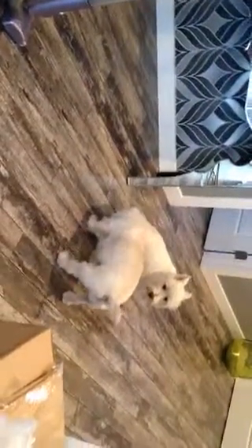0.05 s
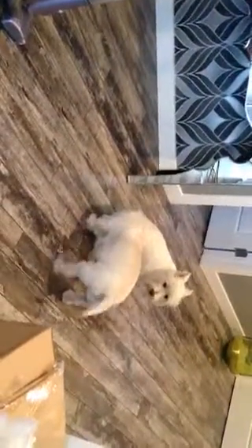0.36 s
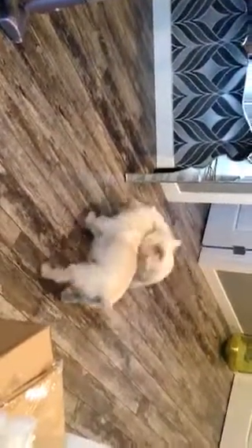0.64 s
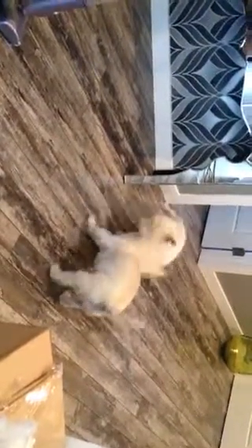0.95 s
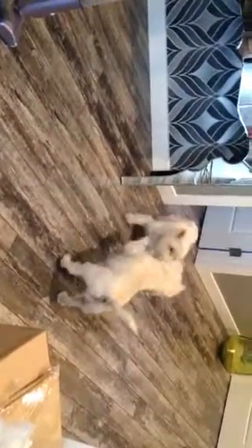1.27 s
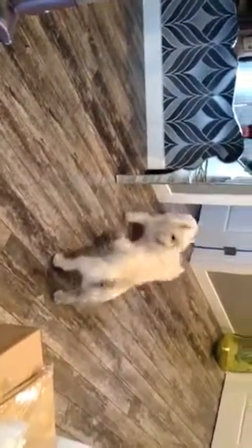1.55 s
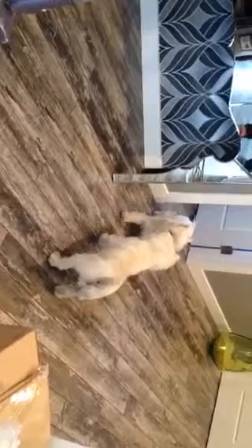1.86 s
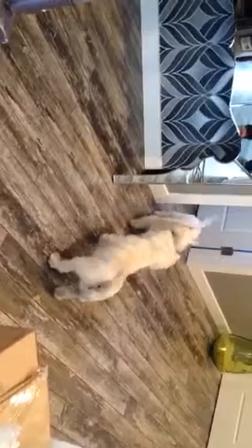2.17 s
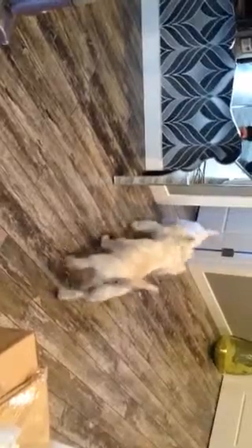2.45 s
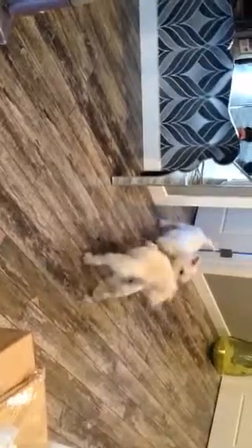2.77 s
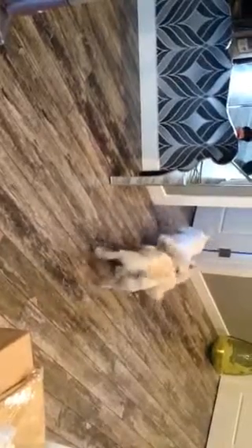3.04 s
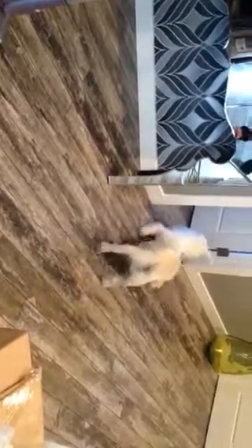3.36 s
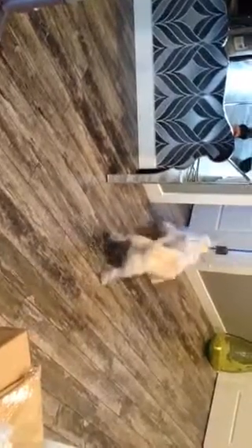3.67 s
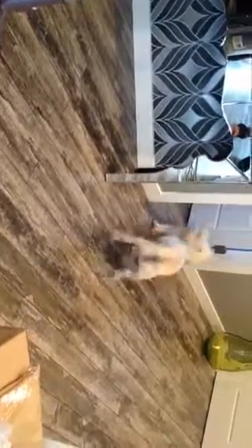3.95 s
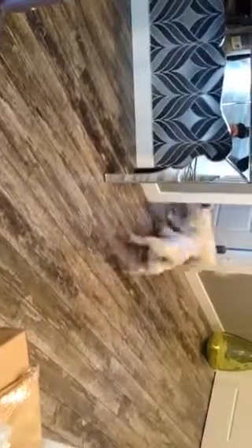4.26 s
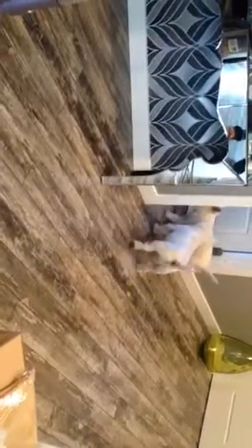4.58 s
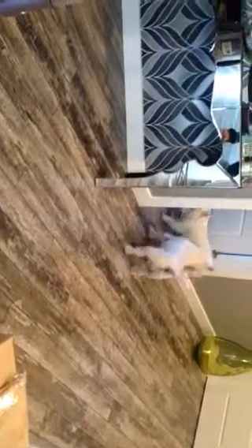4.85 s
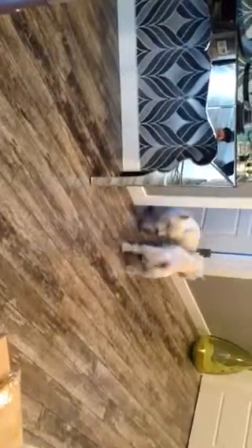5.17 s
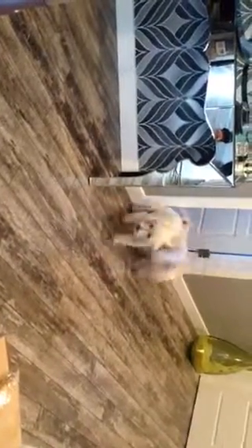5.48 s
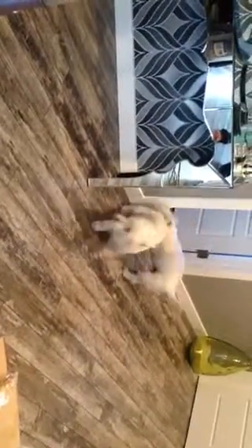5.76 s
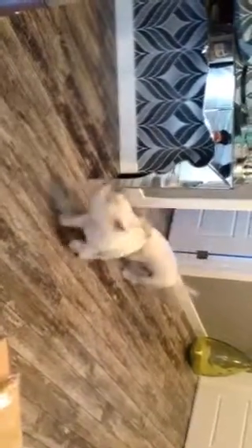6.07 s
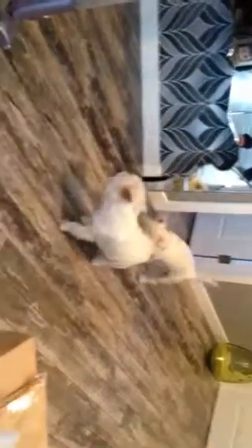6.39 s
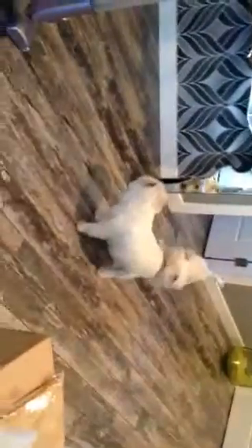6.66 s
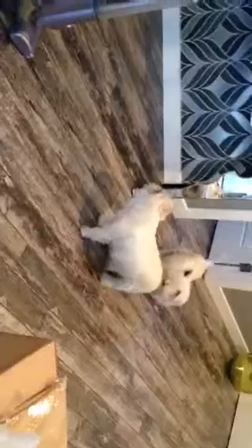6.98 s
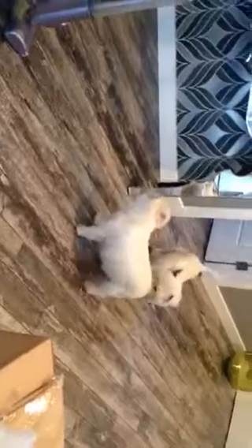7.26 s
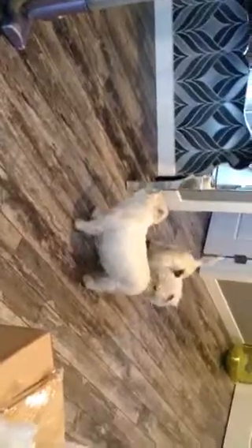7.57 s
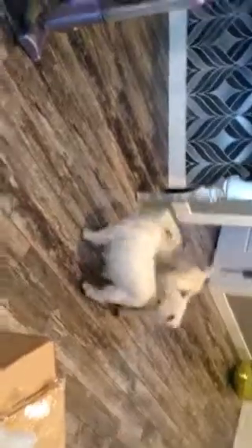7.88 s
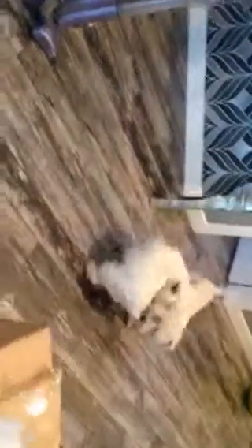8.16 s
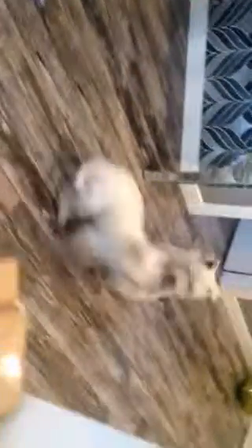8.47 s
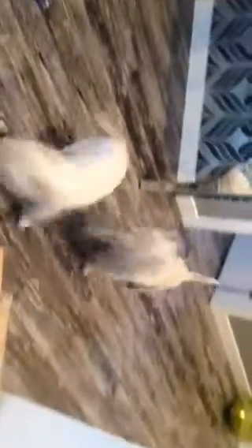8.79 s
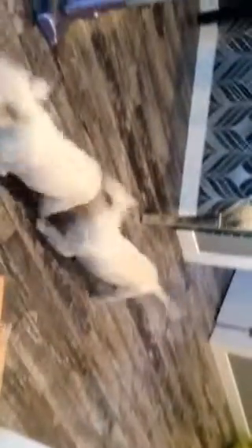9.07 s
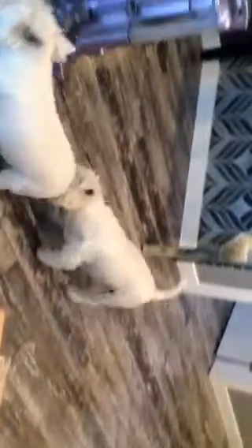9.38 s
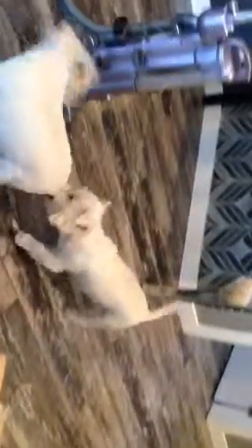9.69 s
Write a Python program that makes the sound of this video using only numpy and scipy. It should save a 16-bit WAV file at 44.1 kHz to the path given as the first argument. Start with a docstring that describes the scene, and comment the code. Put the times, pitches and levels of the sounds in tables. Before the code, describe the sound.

Quick, irregular claw clicks, skids and soft paw thumps of two little dogs tussling indoors, with one bump against a door.

```python
"""Two small dogs wrestle on a plank floor in a hallway, a couple of metres away.
Claws click and chatter, toes rap the planks, paws thump the boards, skid and scrape by stick and slip.
Once a body bumps the door and its latch rattles; later a plastic appliance shell clatters.
Bare walls ring for about half a second over a faint hiss."""
import sys
import numpy as np
from scipy import signal
from scipy.fft import rfft, irfft
from scipy.io import wavfile
from scipy.ndimage import uniform_filter1d

SR = 44100
rng = np.random.default_rng(int(sys.argv[2]) if len(sys.argv) > 2 else 0)


def int16_out(signal):
    """Quantize to a 16-bit WAV file."""
    q = np.round(np.clip(np.atleast_2d(signal).T, -1, 1) * 32767)
    wavfile.write(sys.argv[1], SR, q.astype(np.int16))


N = 437913

# Paw skids. Each row: start in seconds, level in dB, gritty treble in dB, rise time in seconds.
SKID_EVENTS = [(.550, -49, -27, 0.0088), (.635, -51, -23, 0.032), (0.709, -49, -15, 0.017),
               (.905, -54, -12, 0.018), (.963, -44, -7, 0.012), (1.044, -45, -29, 0.011),
               (1.10, -49, -29, 0.015), (1.298, -45.5, -10.5, 0.021), (1.659, -58, -2, 0.025),
               (1.843, -51, -14, 0.0091), (2.524, -50.5, -5, 0.01), (2.673, -53.5, -13, 0.029),
               (3.14, -54, -4, 0.024), (3.175, -52, -8, 0.012), (3.444, -46.5, 2, 0.0073),
               (3.5, -48.5, -24, 0.019), (3.607, -49.5, -6, 0.013), (4.231, -47.5, -9, 0.023),
               (4.535, -54, -4, 0.012), (4.6, -55.5, -2, 0.021), (4.796, -53, -9, 0.018),
               (5.319, -53.5, 0, 0.028), (5.366, -50, -22, 0.013), (5.481, -53, 8.5, 0.0089),
               (5.635, -54, 2.5, 0.021), (5.875, -52.5, -5, 0.0077), (5.925, -48, -27, 0.021),
               (6.068, -46, -24, 0.015), (6.118, -49.5, -26, 0.011), (6.175, -53, -18, 0.013),
               (6.339, -59.5, -2, 0.011), (6.505, -56.5, -20, 0.034), (6.888, -54, -5, 0.013),
               (7.545, -55.5, -13, 0.01), (8.038, -48.5, -10, 0.018), (8.229, -54, -11, 0.023),
               (8.514, -47.5, -4, 0.01), (8.569, -54, -17, .014), (8.665, -46, -4, 0.0086),
               (8.876, -45, -19, 0.0043), (9.355, -54.5, -5, 0.007), (9.596, -60.5, -4, 0.035),
               (9.88, -51, -11, 0.0066)]
# Floorboard modes under a paw. Each row: pitch ratio, width in Hz, level in dB.
BOARD_MODES = [(.88, 50.6, -25), (1.02, 58.7, 13.5), (1.15, 60, -12), (2.3, 300, -8)]
# Spectrum of a sliding paw. Each row: frequency in Hz, level in dB.
RASP_SPECTRUM = [(150, -18), (350, -5), (560, -9.5), (950, -6), (1250, -6.5), (1700, -2.5), (2250, 1.5),
                 (2750, -5.5), (3300, 0.5), (4500, -2.5), (5600, -4), (7000, -13), (11000, -21.5),
                 (15500, -23.5)]
SPOT_SCATTER = 0.14  # relative spread of plank pitch from spot to spot


def undb(db):
    return 10 ** (np.asarray(db) / 20)


def unit(x):
    """Scale to rms 1."""
    return x / np.sqrt(np.mean(x ** 2))


def crest(x, size):
    """Scale the loudest `size` samples to rms 1."""
    return x / np.sqrt(uniform_filter1d(x ** 2, size, mode="constant").max())


def add(track, start_s, x):
    """Mix x into the track."""
    i = int(np.clip(start_s * SR, 0, N - 1))
    track[i:i + len(x)] += x[:N - i]


def band(x, lo_hz, hi_hz, order=3):
    """Butterworth band-pass."""
    edges_hz = np.clip([lo_hz, max(hi_hz, 1.1 * lo_hz)], [20, 30], [18000, 20000])
    return signal.sosfilt(signal.butter(order, edges_hz, "band", fs=SR, output="sos"), x)


def ring(x, hz, width_hz):
    """One resonance, gain 1 at its centre."""
    return signal.lfilter(*signal.iirpeak(min(hz, SR / 2.2), max(hz / width_hz, .5), fs=SR), x)


def body(x, modes):
    """Ring a set of modes; dB sets the energy of each."""
    return sum(undb(db) * ring(x, hz, width_hz) / np.sqrt(width_hz) for hz, width_hz, db in modes)


def colour(x, spectrum):
    """Filter by (Hz, dB) points."""
    hz, db = np.transpose(spectrum)
    bins_hz = np.maximum(np.fft.rfftfreq(len(x), 1 / SR), 1)
    return irfft(rfft(x) * undb(np.interp(np.log(bins_hz), np.log(hz), db)), len(x))


def jitter(count):
    """Normal draws clipped to +-2."""
    return np.clip(rng.standard_normal(count), -2, 2)


def uneven(rows, spread_db):
    """Shift the dB that ends each row at random."""
    return [(*row[:-1], row[-1] + spread_db * z) for row, z in zip(rows, jitter(len(rows)))]


def sway(spread_db, size):
    """Gain gliding to a new random level every `size` samples."""
    levels_db = spread_db * jitter(N // size + 2)
    return undb(np.interp(np.arange(N) / size, np.arange(len(levels_db)), levels_db))


def grit(count, spread_db, size=32):
    """Stick and slip: noise whose strength jumps every `size` samples."""
    slips = undb(spread_db * jitter(count // size + 1))
    return unit(rng.standard_normal(count) * np.repeat(slips, size)[:count])


def strike(count, chatter_s):
    """A firm first contact, then a fading chatter of small ones."""
    t = np.arange(count) / SR
    force = grit(count, spread_db=2.5) * np.exp(-t / chatter_s)
    force[0] = 1.6
    return force


def hiss(level_db=-67.5):
    """Faint steady background noise."""
    # Each row: frequency in Hz, level in dB.
    spectrum = [(25, -21), (81, -6.5), (270, -6), (750, -13.5), (1080, -14.5), (13600, -17.5),
                (15500, -19.5)]
    return undb(level_db) * unit(colour(rng.standard_normal(N), spectrum))


def fading_ring(hz=1520, width_hz=400, level_db=-72.5, t60_s=1.8):
    """A faint mid-pitched ring dies away from the start."""
    tone = unit(ring(ring(rng.standard_normal(N), hz, width_hz), hz, width_hz))
    return undb(level_db) * tone * np.exp(-np.log(1000) * np.arange(N) / SR / t60_s)


def nail_ring(force, hz):
    """A claw rings for a few cycles: a bright ping."""
    return band(ring(force, hz, width_hz=1140), 0.694 * hz, 1.335 * hz)


def claws(count=2048):
    """Claws hit, chatter and ring. Returns the direct sound and the feed to the walls."""
    # Each row: start in seconds, level in dB, chatter time in seconds, wall feed in dB, ring in Hz.
    hits = [(0.524, -35, 0.0012, -2, 4650), (0.5505, -36, 0.00067, -24, 4370),
            (.65, -41.5, .0007, -8, 5070), (.673, -40, .0009, 0.5, 4570), (.726, -37, 0.0021, -5, 4750),
            (.9629, -41.5, .0036, 7.5, 4470), (0.9818, -39.5, .0026, 1.5, 3450),
            (1.0453, -37.5, .0009, -8, 4150), (1.2548, -41, 0.003, 2.5, 4470),
            (1.841, -39, 0.0036, -5, 4400), (2.1198, -52, 0.00091, 2, 4800), (2.519, -45.5, .0019, 1, 4370),
            (2.5432, -46, .0016, 3.5, 4250), (2.6739, -45.5, 0.0012, 0, 4230),
            (2.9469, -39, 0.0011, -4.5, 4650), (3.175, -49, 0.0037, -3, 4620),
            (3.221, -47, 0.00077, 4.5, 4460), (3.336, -52.5, .0007, 4.5, 4160),
            (3.4462, -37.5, 0.002, -1.5, 4050), (3.5193, -49.5, .0044, 12.5, 4660),
            (3.6078, -36.5, 0.0012, -9, 4340), (3.8169, -31, .0014, -0.5, 4100),
            (4.1081, -42, 0.0024, 2, 4400), (4.163, -46.5, .0007, -1, 3600), (4.186, -45, .0025, 6, 4370),
            (4.2104, -38.5, 0.00097, -4, 3980), (4.474, -53, .0006, -6, 4200),
            (4.5419, -55, 0.0024, 2, 3600), (4.8161, -49, .0014, 5.5, 3680), (5.366, -39.5, .003, 0, 3750),
            (5.453, -45, 0.0046, 1, 3800), (5.4817, -37, 0.0017, 4.5, 3900), (5.5453, -44, .0015, -1, 4100),
            (5.658, -41.5, .0025, 2.5, 3940), (5.8726, -41.5, 0.0012, 1, 4080),
            (6.034, -42.5, 0.0015, 3.5, 4410), (6.119, -38, 0.0027, -14, 4300),
            (6.338, -45, 0.0042, -6, 4000), (6.372, -53, .0012, -2, 4900),
            (6.6592, -48, 0.00095, 3.5, 4630), (6.672, -52.5, .0012, 4.5, 4200),
            (7.0396, -51.5, 0.00088, 5, 5100), (7.2059, -51, 0.0036, 1, 4940),
            (7.546, -52, .002, 2.5, 4770), (7.8587, -44, 0.0059, 0.5, 4740), (7.968, -47, .001, 3.5, 4240),
            (8.038, -43, .0011, 2.5, 4600), (8.051, -44, 0.0021, -10, 4250),
            (8.2785, -43, 0.00098, -7, 4800), (8.3385, -45, .0014, 6, 4800),
            (8.5142, -32, .0007, -4.5, 5000), (8.5885, -40.5, 0.00055, -1, 5270),
            (8.6456, -30, 0.0007, -4, 5450), (8.6754, -38, 0.0032, -13, 5110),
            (8.8427, -44.5, .0007, -9, 5600), (8.876, -32, 0.0025, -1.5, 5130),
            (9.0571, -32, 0.0012, -7, 5020), (9.1575, -31, 0.00016, 0, 6300), (9.1612, -30, .0037, 1, 4570),
            (9.356, -50, .0021, -4, 4950), (9.724, -54, .0011, 4.5, 4290), (9.879, -47.5, 0.0013, -8, 4860)]
    # Treble tick over the scene. Each row: time in seconds, level against the nail in dB.
    tick_curve = [(0.55, -37), (1.0, -22), (3.15, -15), (3.9, -9.5), (5.5, -19), (7.1, -15), (8.1, -12),
                  (8.6, -8.5), (9.9, -6)]
    # Modes of the plank's hard top layer. Each row: frequency in Hz, width in Hz, level in dB.
    plank_modes = [(686, 560, -4.5), (2190, 220, 3.5), (3400, 350, 0), (5000, 1000, 7)]
    direct, to_walls = np.zeros((2, N))
    t, impulse = np.arange(count) / SR, signal.unit_impulse(count)
    for start_s, db, chatter_s, wall_db, hz in hits:
        force = strike(count, chatter_s)
        force += 0.13 * grit(count, spread_db=4.5) * np.exp(-t / 0.011)  # neighbouring toes
        nail = crest(nail_ring(force, hz), size=64)
        tick_db = np.interp(start_s, *np.transpose(tick_curve))
        treble = ring(band(force, 6300, 14000, order=2), hz=8400, width_hz=3700)
        tick = undb(tick_db) * crest(treble, size=64)
        spot = np.exp(SPOT_SCATTER * rng.standard_normal())
        modes = [(spot * mode_hz, width_hz, mode_db) for mode_hz, width_hz, mode_db in plank_modes]
        plank = undb(-13.5) * crest(body(force, modes), size=64)
        add(direct, start_s, undb(db) * (nail + tick + plank))
        # The plank radiates all round, so the walls get a broader spectrum.
        broad = undb(-4) * unit(ring(impulse, hz, width_hz=5600))
        broad += undb(-5.5) * unit(body(impulse, modes))
        broad = band(broad, 380, 5350, order=2)
        broad += undb(tick_db - 9.5) * unit(band(impulse, 11700, 13000, order=1))
        add(to_walls, start_s, undb(db + wall_db) * np.std(nail) * broad)
    return direct, to_walls


def knocks(count=4096):
    """A firm toe raps the plank: a short woody note with one overtone."""
    # Each row: start in seconds, level in dB, plank pitch in Hz.
    raps = [(.524, -50.5, 746), (0.55, -48, 1700), (2.946, -51, 2230), (3.226, -52, 684),
            (3.446, -40, 2070), (4.109, -52, 1900), (4.54, -56.5, 1020), (5.365, -53.5, 1090),
            (5.872, -53, 740), (6.118, -51, 895), (6.888, -58, 587), (8.251, -49, 1530),
            (8.513, -45.5, 810), (8.676, -45.5, 530), (8.646, -42, 2150), (9.88, -47, 2220)]
    # Plank modes. Each row: pitch ratio, width as a share of the pitch, level in dB.
    rap_modes = [(1, 0.14, 5), (1.55, 0.18, -8.5)]
    out, t = np.zeros(N), np.arange(count) / SR
    for start_s, db, hz in raps:
        force = strike(count, chatter_s=0.0016) + 0.091 * rng.standard_normal(count) * np.exp(-t / 0.01)
        wood = body(force, [(ratio * hz, share * hz, mode_db) for ratio, share, mode_db in rap_modes])
        add(out, start_s, undb(db) * crest(band(wood, 0.55 * hz, 2.25 * hz, order=2), size=128))
    return out


def board_at(hz):
    """Floorboard modes tuned to a pitch."""
    return [(ratio * hz, width_hz, db) for ratio, width_hz, db in BOARD_MODES]


def paws(count=8192, load_s=0.004):
    """A soft pad loads the board; lower, heavier landings shake the subfloor harder."""
    # Each row: time in seconds, level in dB, board pitch in Hz.
    landings = [(0.526, -52, 312), (0.6, -52, 340), (0.652, -49, 235), (0.669, -42, 188), (0.689, -44, 177),
                (0.722, -49, 184), (0.754, -51, 155), (1.059, -50.5, 338), (1.25, -54, 350),
                (1.32, -42, 338), (1.326, -49, 170), (1.333, -42.5, 295), (1.385, -55, 375),
                (2.516, -50, 304), (2.674, -51, 347), (3.228, -49.5, 227), (3.446, -36, 305),
                (3.456, -39, 355), (4.125, -48, 317), (4.223, -46, 327), (5.483, -39.5, 345),
                (5.495, -42.5, 325), (5.549, -44, 254), (5.62, -51.5, 219), (5.787, -50, 330),
                (5.874, -45, 348), (6.118, -45.5, 338), (6.186, -55, 373), (7.037, -58.5, 364),
                (8.048, -47.5, 312), (8.342, -49.5, 347), (8.515, -43, 258), (8.562, -48, 235),
                (8.644, -38.5, 268), (8.679, -44.5, 355), (8.835, -48, 344), (8.885, -42, 270),
                (8.951, -47, 300), (9.07, -48, 370), (9.154, -43, 360), (9.169, -45, 342)]
    subfloor_hz, subfloor_width_hz, subfloor_db_per_octave = 184, 19, -9
    out, t = np.zeros(N), np.arange(count) / SR
    # Every skid opens with a light footfall.
    footfall_db, footfall_hz = -7.5, 343
    footfalls = [(time_s, db + footfall_db, footfall_hz * np.exp(SPOT_SCATTER * rng.standard_normal()))
                 for time_s, db, _, _ in SKID_EVENTS]
    for time_s, db, hz in list(landings) + footfalls:
        push = grit(count, spread_db=-3) * t * np.exp(-t / load_s)
        subfloor_db = -5 + subfloor_db_per_octave * np.log2(hz / subfloor_hz)
        thump = body(push, [(subfloor_hz, subfloor_width_hz, subfloor_db)] + board_at(hz))
        thump = band(thump, 134, 443, order=2)  # board too small for deep bass, pad too soft for treble
        add(out, time_s - .003, undb(db) * crest(thump, size=128))
    return out


def skids(count=16000):
    """Claws drag over embossed grain in a swell of tiny slips, ringing nail and plank."""
    out = np.zeros(N)
    for start_s, db, grit_db, rise_s in SKID_EVENTS:
        slips = grit(count, spread_db=3.5, size=130)
        claw_hz, spot_hz = rng.uniform(2350, 5900), rng.uniform(1530, 2780)
        nail = undb(-16) * unit(band(ring(slips, claw_hz, width_hz=940), 3000, 5800))
        plank = undb(-14) * unit(ring(slips, spot_hz, width_hz=280))
        sand = undb(grit_db - 9) * unit(ring(band(slips, 4200, 16000, order=2), hz=8400, width_hz=9600))
        rasp = undb(-1.5) * unit(colour(slips, uneven(RASP_SPECTRUM, spread_db=1.6)))
        u = np.arange(count) / SR / rise_s
        pressure = u * np.exp(1 - u)
        add(out, start_s - .004, undb(db) * (rasp + nail + plank + sand) * pressure)
    return out


def tussle(rise_db_per_s=255, fall_db_per_s=34.5, fidget_db=-72.5):
    """The dogs' effort as a gain: bouts flare, hold and settle towards a steady fidget."""
    # Each row: start in seconds, end in seconds, level in dB.
    bouts = [(0.55, 0.588, -54), (1.004, 1.152, -59), (2.13, 2.286, -68), (3.606, 4.022, -62.5),
             (4.11, 4.296, -58), (4.944, 5.11, -65), (5.284, 5.34, -57), (5.352, 5.532, -55),
             (5.7, 6.3, -57), (6.966, 7.115, -66), (7.704, 7.955, -68), (8.18, 9.006, -59.5),
             (9.153, 9.396, -59), (9.876, 9.93, -57.5)]
    t = np.arange(N) / SR
    bouts_db = [db - rise_db_per_s * np.maximum(start_s - t, 0) - fall_db_per_s * np.maximum(t - end_s, 0)
                for start_s, end_s, db in bouts]
    floor_db = np.where(t > bouts[0][0], fidget_db, -np.inf)
    return undb(np.max(bouts_db + [floor_db], axis=0))


def shuffle(touches_per_s=35, chatter_s=0.0024):
    """Feet and fur rub, stray claws tap or graze, weight shifts on the boards."""
    rub = unit(colour(grit(N, spread_db=4, size=400) * sway(spread_db=3, size=600), RASP_SPECTRUM))
    touches = (rng.random(N) < touches_per_s / SR) * rng.uniform(.3, 1, N) ** 2
    chatter = signal.lfilter([1], [1, -np.exp(-1 / (chatter_s * SR))], touches) * rng.standard_normal(N)
    taps = unit(band(ring(chatter, hz=3100, width_hz=2400), 3750, 5070))
    grazes = unit(ring(touches * rng.standard_normal(N), hz=9500, width_hz=3300))
    load = rng.standard_normal(N) * sway(spread_db=5, size=1024)
    boards = unit(band(body(load, board_at(hz=325)), 113, 700))
    return tussle() * (rub + undb(-8.5) * taps + undb(-16.5) * grazes + undb(-9.5) * boards)


def scratches(length_s=0.02):
    """A claw dragged along the grain rings as long as it slips."""
    # Each row: start in seconds, level in dB, ring in Hz.
    drags = [(.956, -46, 4640), (1.294, -50, 4300), (3.13, -50.5, 4700), (3.178, -49, 4250),
             (3.51, -42.5, 4680), (4.325, -53.5, 3900), (5.45, -50, 3820), (6.072, -53, 4440),
             (6.985, -64, 4700), (7.147, -60.5, 4850), (7.214, -64, 5050), (8.235, -50.5, 5400)]
    out, count = np.zeros(N), int(length_s * SR)
    swell = np.sin(np.linspace(0, np.pi, count))
    for start_s, db, hz in drags:
        add(out, start_s, undb(db) * unit(nail_ring(grit(count, spread_db=5) * swell, hz)))
    return out


def scrapes(width_hz=270, glide=0.024):
    """A loaded pad slides and rings the plank hollowly; the note sinks as the paw slows."""
    # Each row: start in seconds, level in dB, plank pitch in Hz, length in seconds.
    slides = [(1.664, -56, 1710, 0.049), (4.24, -53, 1990, 0.059), (5.362, -46, 2050, 0.02),
              (5.392, -47, 2240, 0.021), (5.929, -53, 1750, 0.036), (6.063, -52, 2410, 0.03)]
    out = np.zeros(N)
    for start_s, db, hz, length_s in slides:
        count = int(length_s * SR)
        u, slips = np.linspace(0, 1, count), grit(count, spread_db=11)
        early = ring(slips, hz * (1 + glide), width_hz)
        late = ring(slips, hz * (1 - glide), width_hz)
        hollow = band((1 - u) * early + u * late, 0.59 * hz, 1.6 * hz, order=2)
        add(out, start_s, undb(db) * unit(hollow) * np.sin(np.pi * u))
    return out


def door_bump(start_s=3.818, level_db=-32.5):
    """A dog knocks once against the hollow door, which rings."""
    # Each row: frequency in Hz, width in Hz, level in dB.
    door_modes = [(80, 50, -24), (177, 68, -5.5), (330, 22, 0), (360, 23, 4), (452, 32, -22),
                  (574, 110, -5.5), (695, 33, -7.5), (780, 71, -5), (885, 48, -6), (954, 26, -9)]
    out = np.zeros(N)
    thud = band(body(signal.unit_impulse(16384), door_modes), 45, 880, order=6)
    add(out, start_s, undb(level_db) * crest(thud, size=256))
    return out


def rattle(modes, start_s, level_db, fade_s=0.022, mean_gap_s=0.0043, contacts=8):
    """A loose part clatters: uneven, fading contacts, each favouring other modes."""
    out = np.zeros(N)
    gaps_s = mean_gap_s * (.5 + rng.random(contacts))
    for lag_s in np.cumsum(gaps_s) - gaps_s[0]:
        contact = body(strike(4096, chatter_s=0.00046), uneven(modes, spread_db=4.5))
        contact = crest(band(contact, 1030, 7000, order=2), size=128)
        add(out, start_s + lag_s, undb(level_db) * np.exp(-lag_s / fade_s) * contact)
    return out


def latch_rattle():
    """The door bump shakes the latch."""
    # Each row: frequency in Hz, width in Hz, level in dB.
    latch_modes = [(1670, 290, 3), (2430, 260, 4), (3060, 230, -3)]
    return rattle(latch_modes, start_s=3.817, level_db=-40.5)


def shell_rattle():
    """A bumped appliance's plastic shell clatters."""
    # Each row: frequency in Hz, width in Hz, level in dB.
    shell_modes = [(2100, 190, 11), (2400, 260, 5), (3170, 260, 6), (3850, 620, 0), (4560, 450, 4),
                   (6100, 1400, -8)]
    return rattle(shell_modes, start_s=9.163, level_db=-32.5)


def hallway(x):
    """Dense wall echoes build up within milliseconds; the top treble dies first."""
    # Each row: frequency in Hz, reverberation time in seconds, level in dB.
    hall_bands = [(120, 0.52, 3), (318, 0.51, 3), (696, 0.56, 2), (1350, 0.79, 0), (1990, 0.8, -3),
                  (3680, 0.53, 3.5), (4460, 0.58, -1.5), (8700, 0.56, 3), (14300, 0.32, 5)]
    t = np.arange(SR) / SR
    hz, t60_s, db = np.transpose(hall_bands)
    noise = rfft(rng.standard_normal(SR))
    band_index = np.interp(np.log(np.arange(len(noise)) + 1), np.log(hz), np.arange(len(hz)))
    echoes = np.zeros(SR)
    for k in range(len(hz)):
        band_noise = irfft(noise * np.maximum(1 - abs(band_index - k), 0), SR)
        echoes += undb(db[k]) * band_noise * np.exp(-np.log(1000) * t / t60_s[k])
    echoes *= np.clip((t - .003) / 0.0046, 0, 1)
    echoes *= 1 + 0.37 * np.exp(-((t - .018) / 0.0057) ** 2)  # early cluster off door and near wall
    return signal.fftconvolve(x, echoes / np.sqrt(SR * 0.028))[:N]


def scattered_echoes(x, patterns=6, change_s=.011):
    """Paws stand on different spots, so successive sounds crossfade through several echo patterns."""
    turn = np.arange(N) / SR / change_s
    distances = [abs((turn - k + 1) % patterns - 1) for k in range(patterns)]
    return sum(hallway(x * np.cos(np.pi / 2 * np.minimum(d, 1))) for d in distances)


def wall_resonance(echoes):
    """A narrow resonance lingers between the walls."""
    # Each row: frequency in Hz, width in Hz, gain in dB.
    wall_modes = [(3150, 70, -10)]
    return sum(undb(db) * ring(echoes, hz, width_hz) for hz, width_hz, db in wall_modes)


def scene():
    """Direct sound plus wall echoes over the hiss, the same in both channels."""
    clicks, clicks_to_walls = claws()
    thumps = paws()
    rubbing = skids() + shuffle() + scrapes()
    dragging, wood = scratches(), knocks()
    door, clatter = door_bump(), latch_rattle() + shell_rattle()
    direct = clicks + thumps + rubbing + dragging + wood + door + clatter
    bright_feed = (clicks_to_walls + undb(-4.5) * rubbing + undb(-8.5) * dragging
                   + undb(-7.5) * clatter + undb(-3.5) * wood)
    low_feed = undb(-7.5) * thumps + undb(-3.5) * door
    echoes = scattered_echoes(bright_feed) + hallway(low_feed)
    return np.tile(direct + echoes + wall_resonance(echoes) + hiss() + fading_ring(), (2, 1))


def record(dry):
    """Steep low-pass on the top treble."""
    top_hz = 15600
    return signal.sosfilt(signal.ellip(10, .2, 70, top_hz, fs=SR, output="sos"), dry)


dry = scene()
out = record(dry)
int16_out(out)
```